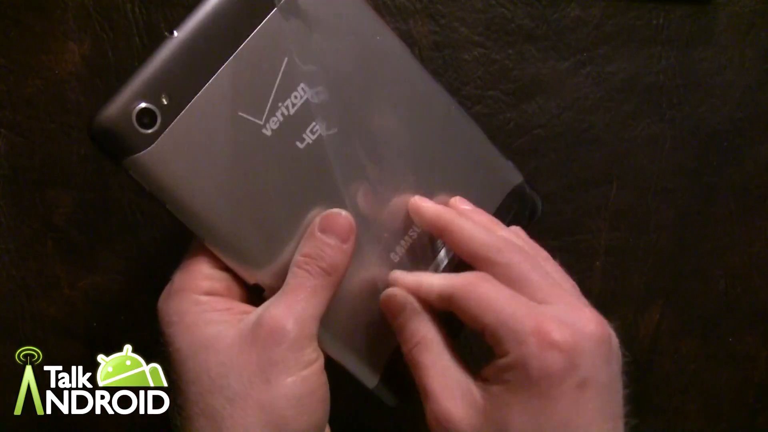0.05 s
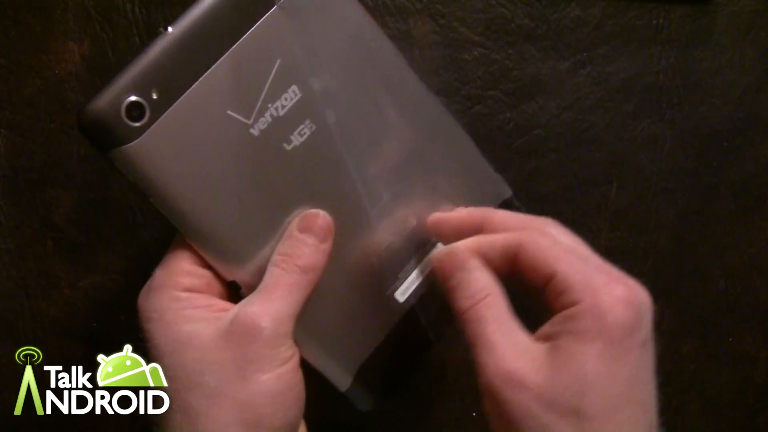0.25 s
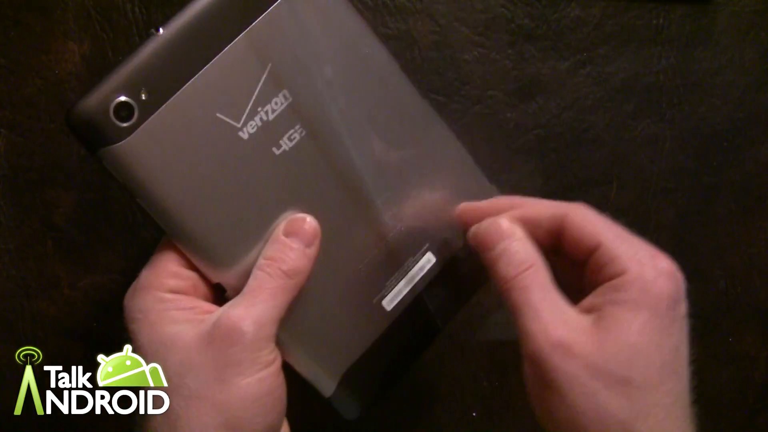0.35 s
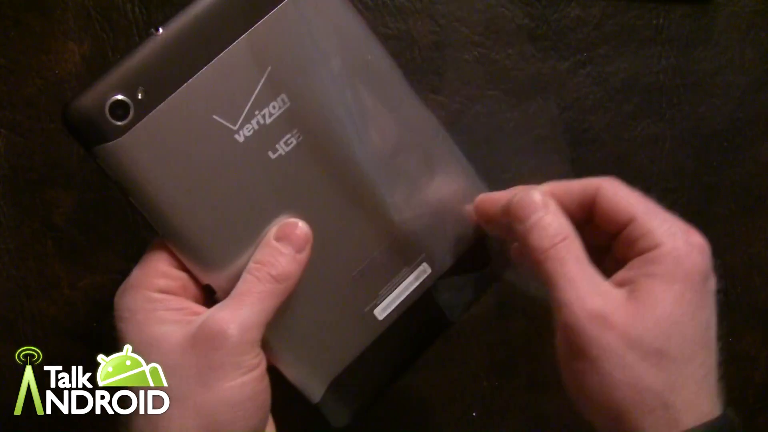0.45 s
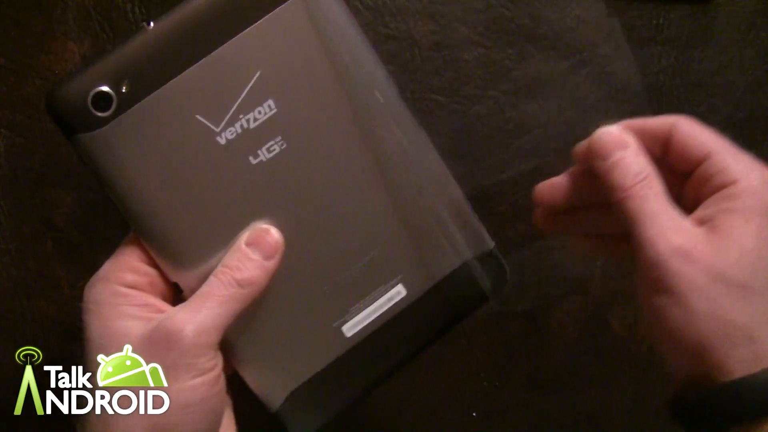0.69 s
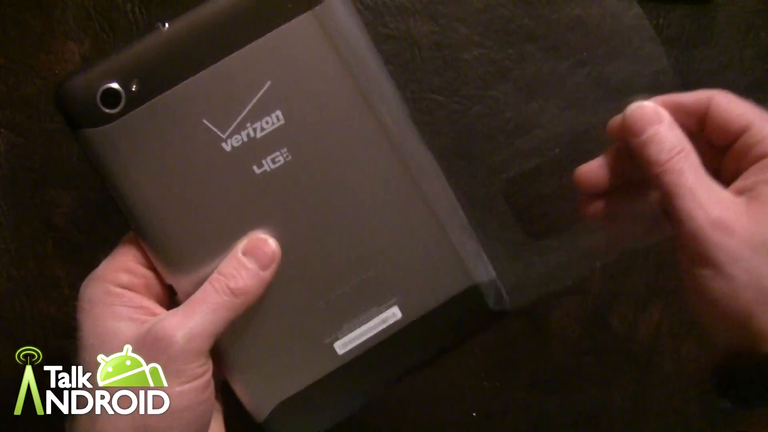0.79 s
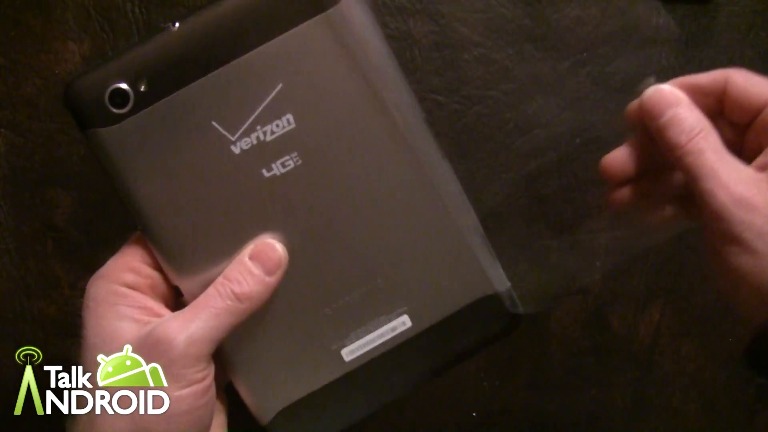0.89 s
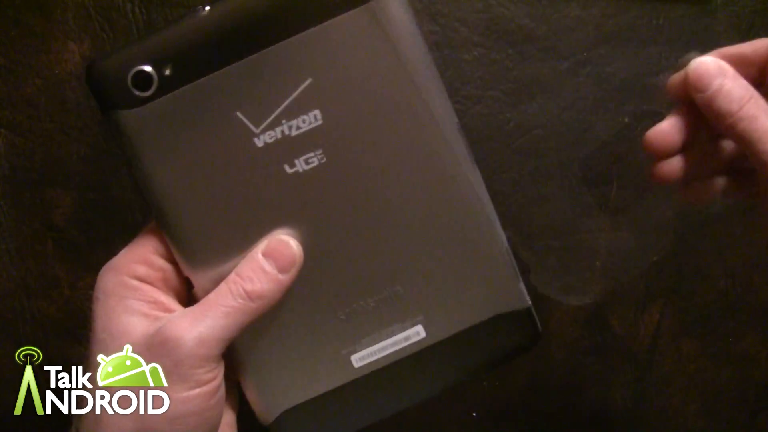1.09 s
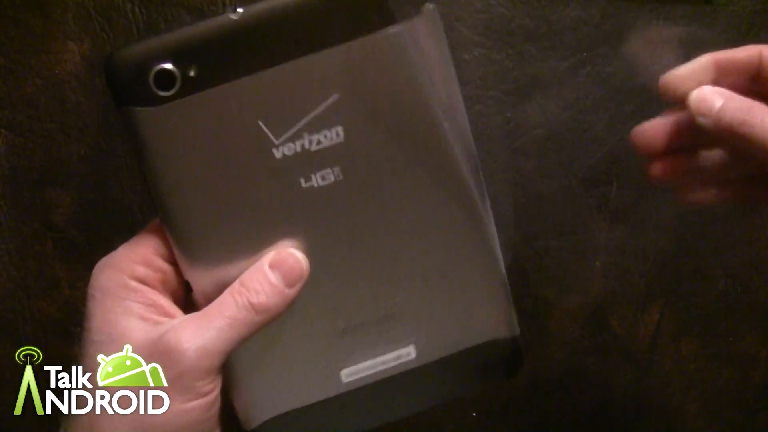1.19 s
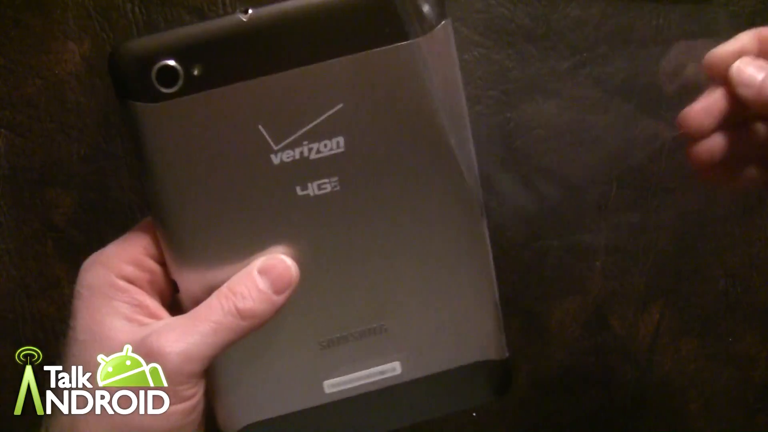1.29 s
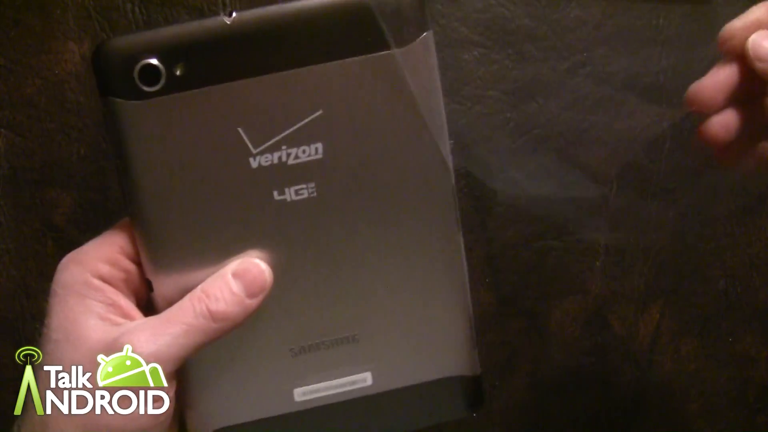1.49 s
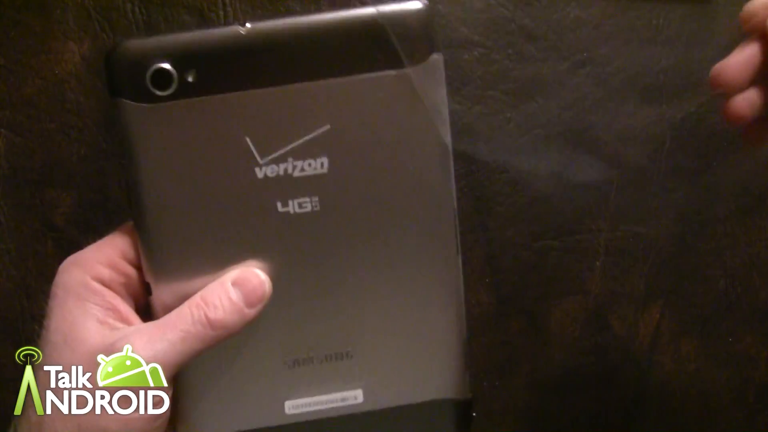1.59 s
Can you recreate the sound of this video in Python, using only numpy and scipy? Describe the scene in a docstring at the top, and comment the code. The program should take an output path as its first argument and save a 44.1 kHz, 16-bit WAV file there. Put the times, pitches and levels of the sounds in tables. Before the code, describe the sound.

Close up in a quiet room, sticky plastic film lets go of a hand-held slab in crowded sharp snaps with small dull thuds, stops abruptly, then the loose film crinkles lightly over faint noise.

```python
"""Small sharp snaps are heard first, crowding into a crackling run: a thin film is pulled off a hand-held slab.
The glue lets go in jerks; each is a first crack and a swarm of tiny cracks, filtered to its own colour.
Damped low modes make the slab thud with the snaps and knock under the fingers; dense faint ticks make the
film rustle. After the run the loose film crinkles now and then. A short decaying-noise tail, quiet noise and
a low hum lie underneath in the quiet room."""
import sys
import numpy as np
from scipy import signal
from scipy.fft import rfft, irfft
from scipy.io import wavfile
from scipy.ndimage import uniform_filter1d

SR = 44100
rng = np.random.default_rng(int(sys.argv[2]) if len(sys.argv) > 2 else 0)


def persist_wave(psi):
    """Save psi, clipped to +-1, as 16-bit WAV."""
    counts = np.round(np.clip(psi, -1, 1) * 32767).astype(np.int16)
    wavfile.write(sys.argv[1], SR, np.atleast_2d(counts).T)


N = 72765  # length in samples


def undb(db):
    """Level to amplitude: decibels become a gain."""
    return 10 ** (np.asarray(db) / 20)


def shape(table, hz):
    """Spectral envelope: interpolate (f/Hz, value) points on a log-frequency axis."""
    table = np.array(table, float)
    return np.interp(np.log(hz + 1), np.log(table[:, 0] + 1), table[:, 1])


def causal(db):
    """Minimum phase: fold the cepstrum of a gain in dB per bin onto positive time."""
    cepstrum = irfft(db * np.log(10) / 20)
    half = cepstrum.shape[-1] // 2
    cepstrum[..., 1:half] *= 2
    cepstrum[..., half + 1:] = 0
    return np.exp(rfft(cepstrum))


def coloured(x, table):
    """Linear filtering: weight the spectrum by (f/Hz, level/dB) points, then set the rms to 1."""
    hz = np.arange(N // 2 + 1) * SR / N
    y = irfft(rfft(x) * undb(shape(table, hz)), N)
    return y / np.sqrt(np.mean(y ** 2))


def unit(x):
    """Energy normalisation: each row gets energy 1."""
    return x / np.sqrt(np.sum(x ** 2, axis=-1, keepdims=True))


def place(rows, times):
    """Superposition: add short sounds at their times in seconds."""
    out = np.zeros(N + rows.shape[1])
    for row, s in zip(rows, times):
        start = int(s * SR)
        out[start:start + len(row)] += row
    return out[:N]


def resonance_db(ratio, db, q=4.5):
    """Resonance: a narrow peak in dB at frequency ratio 1, of sharpness q."""
    return db / (1 + (q * (ratio - 1 / ratio)) ** 2)


# snaps of the film, levels before the shared colour:
# t/s, burst length/ms, body f/Hz, body level/dB, high-mid level/dB, treble level/dB
SNAP_EVENTS = [(0.035, 2.4, 2240, -31.5, -34.5, -50), (0.0488, 2.2, 5400, -33.5, -25, -41),
               (0.0553, 2.1, 2170, -32.5, -40, -46), (0.0684, 1.5, 3380, -31, -27.5, -39),
               (0.082, 1.1, 1590, -29.5, -35, -38), (0.0902, 0.48, 1900, -21, -27.5, -39),
               (0.0998, 1.2, 2040, -36, -42, -43), (0.1033, 1.2, 2130, -22.5, -23.5, -38),
               (0.1236, 3, 1150, -32.5, -54, -56), (0.1774, 0.9, 2300, -34.5, -54, -33.5),
               (0.203, 0.43, 2520, -23.5, -45, -42), (0.2086, 1.5, 2080, -11.5, -16.5, -16),
               (0.217, 0.82, 2400, -19.5, -11.5, -13), (0.2277, 1.5, 2090, -19.5, -13.5, -19),
               (0.2408, 1.4, 2000, -22.5, -12.5, -22), (0.2531, 1.1, 2060, -16, -18, -16),
               (0.261, 1.3, 2300, -21, -21.5, -21), (0.2712, 0.29, 3030, -23, -5.5, -7),
               (0.2781, 0.89, 2600, -17.5, -11.5, -18), (0.2856, 0.59, 2640, -17.5, -8, -13),
               (0.2891, 1.3, 2940, -20.5, -31, -26), (0.2935, 0.72, 2700, -25, -12, -24),
               (0.2969, 2.6, 3050, -20.5, -23, -21), (0.3024, 1.9, 2970, -36, -14, -25),
               (0.3075, 1.25, 2520, -18, -16, -16.5), (0.3134, 1.3, 2600, -19, -31, -53),
               (0.3266, 0.61, 2480, -21, -13, -22), (0.3368, 1.2, 2000, -20.5, -12, -31),
               (0.3426, 0.2, 2230, -18.5, -9.5, -56), (0.35, 1.1, 2040, -21, -20, -17.5),
               (0.3684, 1.2, 2140, -20.5, -17, -45), (0.3713, 1.6, 2020, -21, -55, -14.5),
               (0.3793, 0.2, 2020, -17, -11.5, -31.5), (0.3992, 0.7, 3190, -19, -16.5, -23),
               (0.4063, 0.8, 2470, -20.5, -45, -16), (0.413, 0.79, 3400, -32, -11, -28),
               (0.4197, 2, 3170, -15, -38, -28), (0.4425, 1.2, 3100, -18, -20, -21.5),
               (0.4544, 2.7, 2380, -24, -21, -24), (0.4579, 1.1, 2770, -37, -16, -47),
               (0.4773, 1.44, 1950, -24, -18.5, -23), (0.5202, 1.32, 2460, -23.5, -20, -15.5),
               (0.5669, 0.65, 3420, -23.5, -20, -17), (0.5828, 1.16, 3450, -22, -21, -18),
               (0.5932, 1.35, 4410, -16.5, -17.5, -15.5), (0.603, 0.95, 3340, -39, -26, -36),
               (0.6115, 0.9, 2760, -24, -13.5, -14.5), (0.6254, 1.4, 2210, -19, -19, -17),
               (0.632, 1.2, 2930, -25.5, -23.5, -20), (0.6477, 0.29, 3760, -12.5, -10.5, -2.5),
               (0.6686, 2.4, 4540, -21, -18, -45), (0.6842, 0.76, 2390, -17, -36, -9.5),
               (0.693, 3.6, 2320, -15.5, -12, -19), (0.7325, 0.35, 1330, -14.5, -5.5, -8),
               (0.7572, 1.3, 1300, -17, -11, -20), (0.761, 1.55, 2640, -13.5, -38, -15),
               (0.9309, 0.65, 3100, -24.5, -39, -36), (0.9882, 0.81, 2920, -40, -32.5, -39.5),
               (1.1004, 0.6, 2400, -28, -23.5, -30.5), (1.1248, 0.65, 1720, -27, -29, -46),
               (1.2185, 0.47, 3350, -17.5, -43, -54), (1.2791, 6, 1820, -31, -30, -80),
               (1.2969, 3.8, 2240, -20, -16.5, -32.5), (1.303, 2, 1050, -20, -13.5, -79),
               (1.352, 1.9, 3000, -14, -37, -28.5), (1.3538, 0.33, 1270, -22.5, -15, -84),
               (1.3693, 2.2, 1400, -34, -25, -46), (1.3819, 1.6, 1240, -33, -24, -59),
               (1.4355, 0.58, 1140, -34.5, -44, -56), (1.4906, 1.13, 2350, -35.5, -30, -77),
               (1.5709, 1.6, 2360, -38.5, -37, -98), (1.6009, 0.22, 1120, -30.5, -62, -79)]
# side against mid signal: f/Hz, level/dB
SIDE_LEVEL = [(500, -12), (2400, -23.5), (4400, -10), (8100, -6.5), (15000, -5.5)]
REF_S = 0.004  # reference duration for the snap levels
BUMP_DB, BUMP_HZ = 2.5, 600  # chance resonances: size, smoothing width
THUD_DB = -16  # push on the slab against the snap's body


def snaps(size=2048):
    """Stick-slip release: each jerk of the glue excites film and slab; gives mid, side and push."""
    rows = np.array(SNAP_EVENTS, float)
    chance = rng.standard_normal((len(rows), 6, size))
    hz = np.arange(size // 2 + 1) * SR / size
    width = max(int(BUMP_HZ * size / SR), 2)

    def smooth(v):
        once = uniform_filter1d(v[:, :len(hz)], width)
        return uniform_filter1d(once, width)

    burst, fade = crack_swarm(rows[:, 1:2], chance, hz, smooth)
    gain = snap_colour(rows, hz)
    mid_gain, side_gain = (gain + BUMP_DB * np.sqrt(width) * smooth(chance[:, i]) for i in (3, 4))
    mid = irfft(burst * causal(mid_gain))
    side = irfft(burst * causal(side_gain))
    # a quarter-period phase shift on top of the side level
    side = irfft(rfft(side) * 1j * undb(shape(SIDE_LEVEL, hz)))
    push = unit(chance[:, 5] * fade) * undb(rows[:, 3:4] + THUD_DB) * np.sqrt(REF_S * SR)
    return [place(v, rows[:, 0]) for v in (mid, side, push)]


RISE = 0.058  # swell time in ms per squared ms of burst length
GRAIN_DB, SPIKE_DB = 6, 3  # unevenness of the cracks; first crack, before weakening with burst length
RING_DB, RING_MS, RING_HZ = -9.5, 13.7, 5000  # the film rings on: level, decay time, dulling corner


def crack_swarm(length_ms, chance, hz, smooth):
    """Impulsive excitation: a first crack, an uneven noise swarm and a duller ring; spectra and fade."""
    ms = np.arange(chance.shape[-1]) / SR * 1000
    fade = np.exp(-ms / length_ms / 2) * (1 - np.exp(-ms / (RISE * length_ms ** 2)))
    swarm = unit(chance[:, 0] * undb(GRAIN_DB * chance[:, 1]) * fade)
    swarm[:, 0] -= undb(SPIKE_DB) / (1 + length_ms[:, 0] ** 2)
    ring_fade = np.exp(-ms / RING_MS) * (1 - np.exp(-ms / length_ms))
    ring = rfft(unit(chance[:, 2] * ring_fade))
    burst = rfft(swarm)
    # flatten the broad spectrum before the snap's colour is applied
    burst = burst * causal(-10 * np.log10(smooth(np.abs(burst) ** 2)))
    return burst + undb(RING_DB) * ring / (1 + (hz / RING_HZ) ** 2), fade


# colour shared by all snaps: f/Hz, level/dB
SHARED_COLOUR = [(40, -64), (450, 0), (1100, -0.5), (7300, -7.5), (9000, -6.5), (15000, -0.5)]
# resonances of the taut film, in every snap while it is pulled: f/Hz, level/dB
FILM_RESONANCES = [(2060, 3), (3250, 5), (4750, 6), (7250, 8)]
# limits of the high-mid and treble bands: f/Hz
BAND_EDGES = [4200, 8500, 16000]
BODY_Q, PEAK_DB = 0.5, 3.5  # sharpness of the body resonance; narrow ring on its pitch
TAUT_UNTIL_S = 0.8  # the film comes free


def snap_colour(rows, hz):
    """Source-filter principle: body resonance, upper bands and taut-film resonances as gain in dB."""
    edges = np.array(BAND_EDGES, float)
    centres = np.sqrt(edges[1:] * edges[:-1])
    density = rows[:, 4:] + 10 * np.log10(REF_S * SR * SR / 2 / np.diff(edges))
    top_db = [shape(list(zip(centres, d)), hz) for d in density]
    top = undb(top_db) ** 2 / (1 + (edges[0] / (hz + 1)) ** 4)
    pitch = rows[:, 2:3]
    ratio = (hz + 1) / pitch
    body = undb(rows[:, 3:4]) ** 2 * REF_S * SR * SR * BODY_Q / np.pi / pitch
    body = body / (1 + (BODY_Q * (ratio - 1 / ratio)) ** 2) ** 3 * 3
    body = body * undb(resonance_db(ratio, PEAK_DB)) ** 2
    film = sum(resonance_db((hz + 1) / f, db) for f, db in FILM_RESONANCES)
    taut = rows[:, :1] < TAUT_UNTIL_S
    return shape(SHARED_COLOUR, hz) + film * taut + 10 * np.log10(body + top)


# modes of the slab in the hand, levels before the low cut: f/Hz, level/dB, t60/s
SLAB_MODES = [(146, -8.5, 0.023), (302.5, 2, 0.039), (428.2, 8, 0.051), (657.5, 3.5, 0.049),
              (990, 2, 0.036)]
# soft knocks of the fingers and larger tugs: t/s, peak level/dB
FINGER_KNOCKS = [(0.084, -31), (0.103, -24), (0.289, -21), (0.61, -28), (0.691, -21), (0.732, -23),
                 (0.758, -20), (0.833, -31), (0.9305, -32.5), (1.01, -42), (1.126, -28.5), (1.189, -30.5),
                 (1.235, -28.5), (1.271, -33), (1.3, -15.5), (1.349, -32.5), (1.37, -26)]
KNOCK_MS, LOW_CUT_HZ = 4.56, 112
KNOCK_SCATTER_DB = 2.5  # each knock wakes the modes differently


def slab(push, size=4096):
    """Modal superposition: damped low modes answer every snap and every knock."""
    t = np.arange(size) / SR
    modes = [undb(db) * np.sin(2 * np.pi * hz * t) * np.exp(-np.log(1000) * t / t60)
             for hz, db, t60 in SLAB_MODES]
    low_cut = signal.butter(2, LOW_CUT_HZ, "high", fs=SR, output="sos")
    modes = signal.sosfilt(low_cut, modes)
    response = unit(modes.sum(axis=0))
    rows = np.array(FINGER_KNOCKS, float)
    scatter = undb(KNOCK_SCATTER_DB * rng.standard_normal((len(rows), len(SLAB_MODES))))
    contact = rng.standard_normal((len(rows), size)) * np.exp(-t * 1000 / KNOCK_MS)
    knocks = signal.fftconvolve(contact, scatter @ modes, axes=1)
    knocks *= undb(rows[:, 1:]) / np.abs(knocks).max(axis=1, keepdims=True)
    thuds = signal.fftconvolve(push, response)[:N]
    return thuds + place(knocks, rows[:, 0])


# rustle of the film between snaps: t/s, level/dB
RUSTLE_LEVEL = [(.015, -55), (0.032, -44.5), (.14, -48), (.19, -46), (.3, -53), (0.777, -36.5),
                (0.881, -73.5), (1.292, -40.5), (1.45, -51.5), (1.6, -47.5)]
# its relative spectrum: f/Hz, level/dB
RUSTLE_SPECTRUM = [(40, -31), (300, 6), (3000, -14), (12000, -25.5)]
RUSTLE_PER_S = 3000  # mean tick rate


def rustle():
    """Shot noise: random dense faint ticks of the moving film, filtered and swelled."""
    ticks = (rng.random(N) < RUSTLE_PER_S / SR) * rng.standard_normal(N)
    s, db = np.array(RUSTLE_LEVEL, float).T
    level = undb(np.interp(np.arange(N) / SR, s, db))
    return level * coloured(ticks, RUSTLE_SPECTRUM)


# reverberation time of the room: f/Hz, t60/s
ROOM_DECAY = [(300, 0.13), (3000, 0.22), (14000, 0.24)]
ROOM_DB, ROOM_RISE_S, ROOM_DULL_HZ = -16.5, 0.00088, 8200
ROOM_ALIKE = 1  # 1: same tail left and right


def room(x, size=16384):
    """Diffuse reverberation: convolution with dull noise decaying exponentially in octave bands."""
    t, hz = np.arange(size) / SR, np.arange(size // 2 + 1) * SR / size
    noise = rng.standard_normal((3, size))
    noise = ROOM_ALIKE * noise[0] + np.sqrt(1 - min(ROOM_ALIKE, 1) ** 2) * noise[1:]
    spectrum = rfft(noise) / (1 + (hz / ROOM_DULL_HZ) ** 2)
    tail = 0
    for centre in 125 * 2. ** np.arange(8):
        weight = np.clip(1 - np.abs(np.log2((hz + 1) / centre)), 0, 1)
        band = irfft(spectrum * weight)
        tail = tail + band * np.exp(-np.log(1000) * t / shape(ROOM_DECAY, centre))
    tail = unit(tail * (1 - np.exp(-t / ROOM_RISE_S)))
    return undb(ROOM_DB) * signal.fftconvolve(x[None], tail, axes=1)[:, :N]


# relative spectrum of the room noise: f/Hz, level/dB
AIR_SPECTRUM = [(30, -6), (430, -4.5), (4000, -21.5), (8000, -28), (16000, -31.5)]
AIR_DB = -48  # rms
HUM_HZ, HUM_DB = 118.8, -61.5  # level is rms


def air():
    """Stationary background: noise independent in each channel, and a sinusoidal mains hum."""
    noise = np.array([coloured(n, AIR_SPECTRUM) for n in rng.standard_normal((2, N))]) * undb(AIR_DB)
    hum = np.sqrt(2) * undb(HUM_DB) * np.sin(2 * np.pi * HUM_HZ * np.arange(N) / SR)
    return noise + hum


# left over right: f/Hz, level/dB
LEFT_OVER_RIGHT = [(4000, 1), (8000, -0.7), (12000, -0.2)]


def scene():
    """Mid-side superposition: film and slab close by, their tail, then the background."""
    mid, side, push = snaps()
    mid = mid + slab(push) + rustle()
    sign = np.array([[1], [-1]])  # left, right
    hz = np.arange(N // 2 + 1) * SR / N
    lean = undb(sign * shape(LEFT_OVER_RIGHT, hz) / 2)
    stereo = mid + side * sign + room(mid)
    return irfft(rfft(stereo) * lean, N) + air()


def record(dry):
    """Saturation and band limiting: the camera clips at full scale and cuts the top."""
    clipped = np.clip(dry, -1.0, 1.0)
    top_cut = signal.ellip(10, .2, 70, 15800, fs=SR, output="sos")  # passband edge in Hz
    return signal.sosfilt(top_cut, clipped)


dry = scene()
out = record(dry)
persist_wave(out)
```